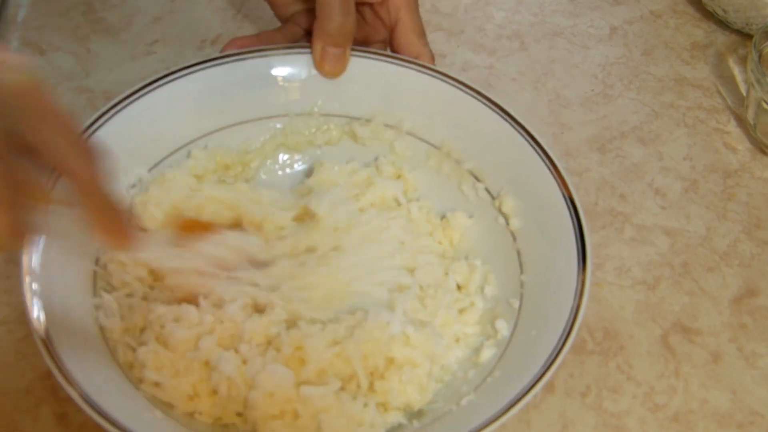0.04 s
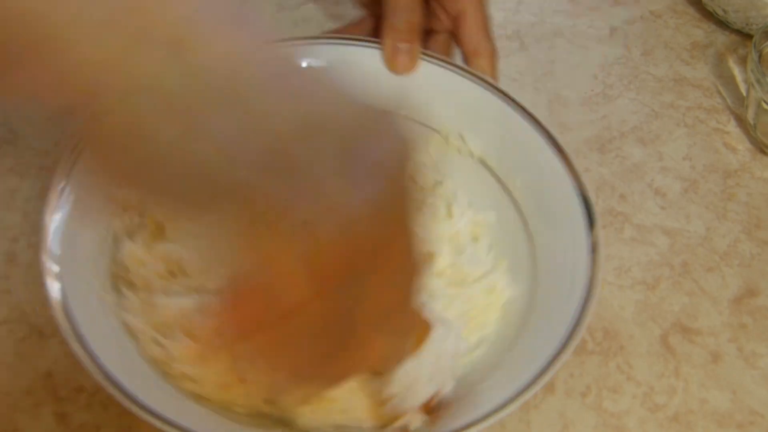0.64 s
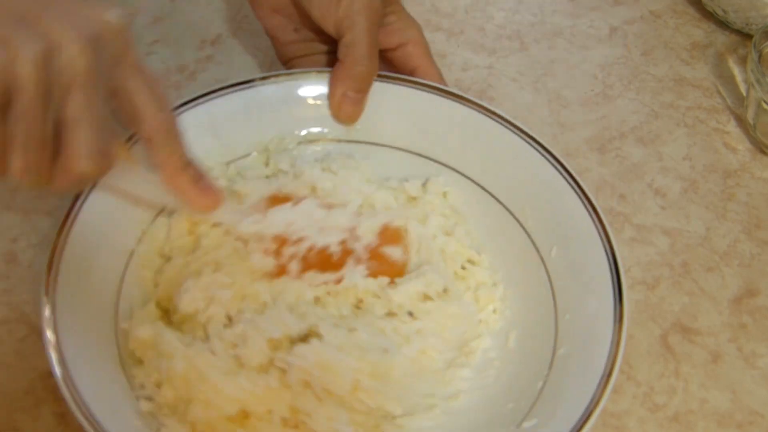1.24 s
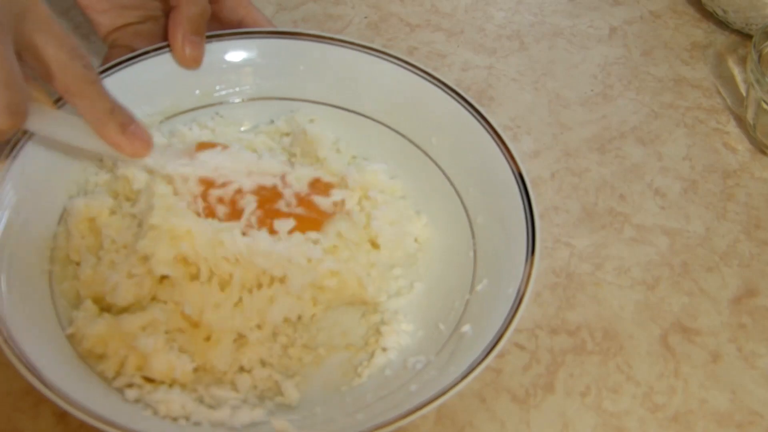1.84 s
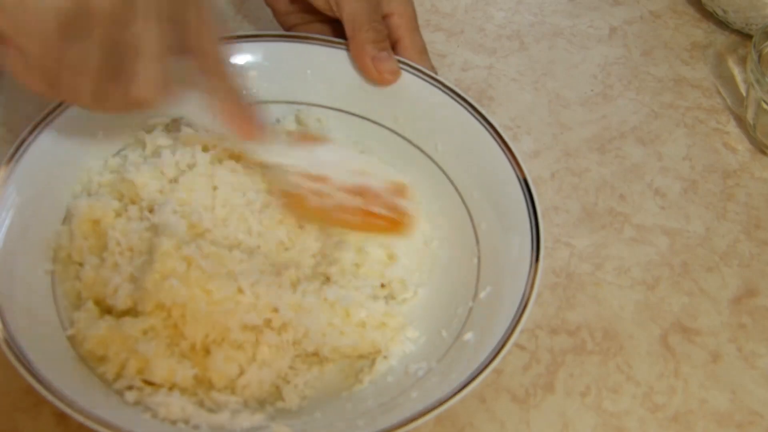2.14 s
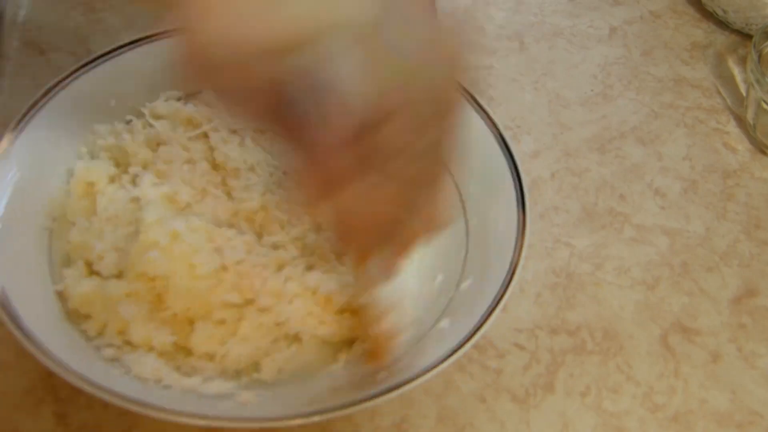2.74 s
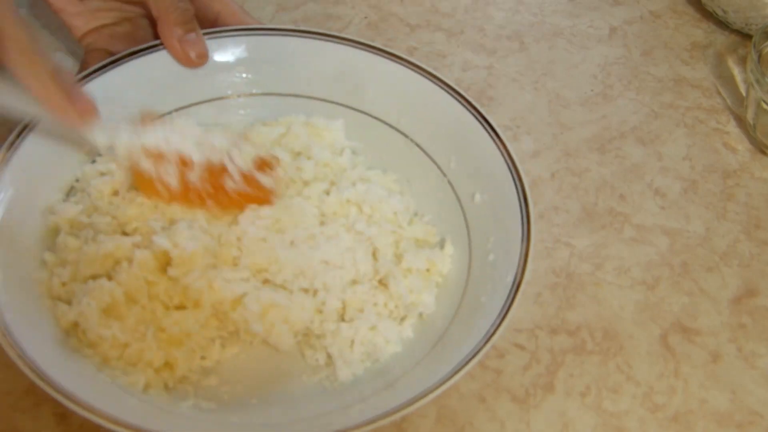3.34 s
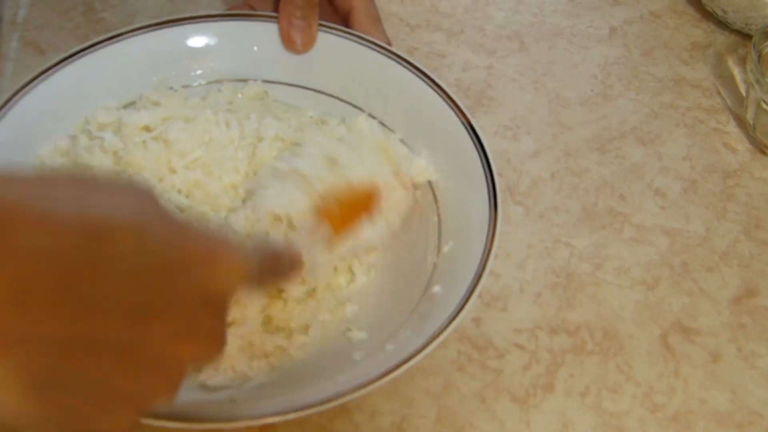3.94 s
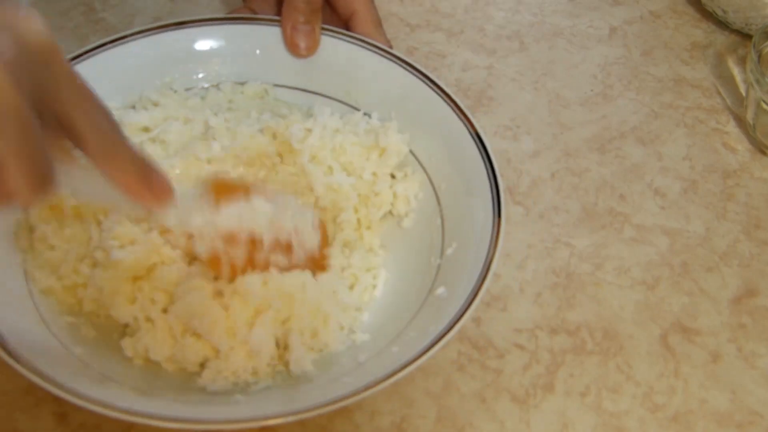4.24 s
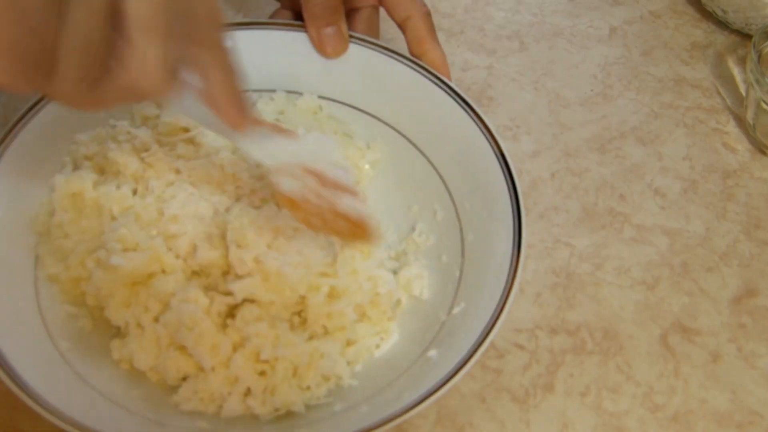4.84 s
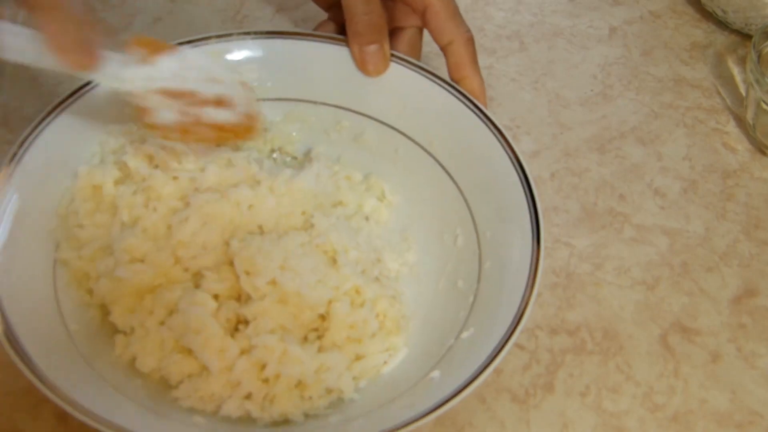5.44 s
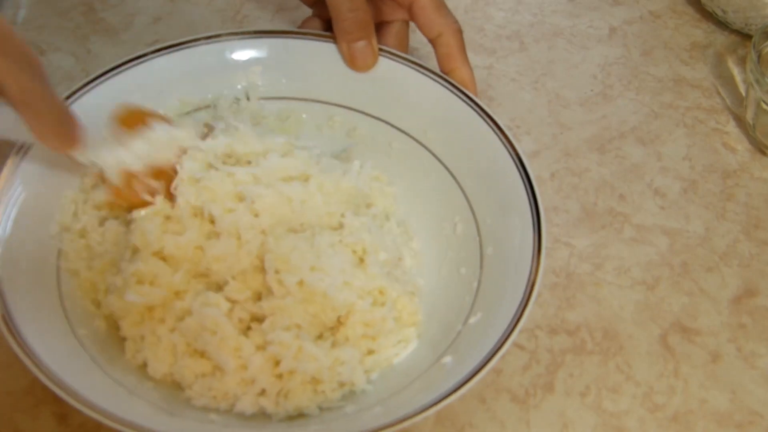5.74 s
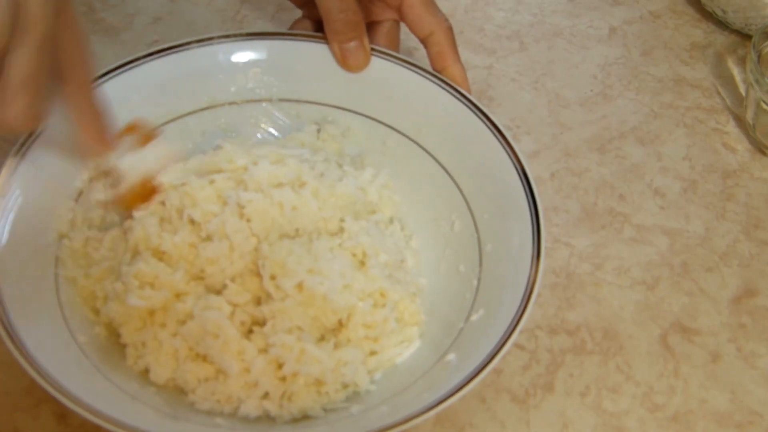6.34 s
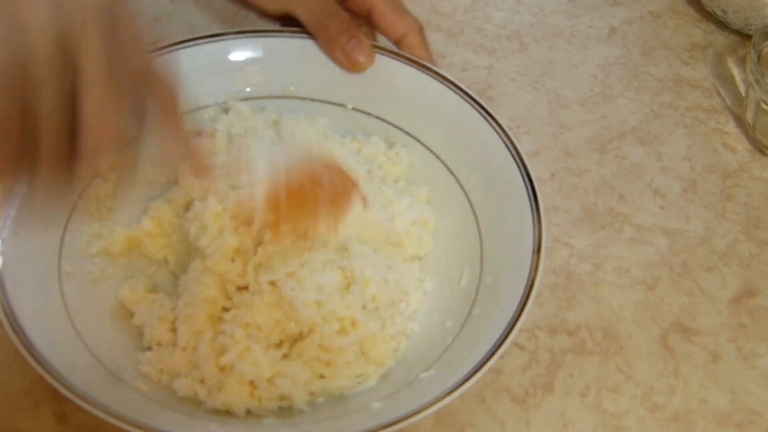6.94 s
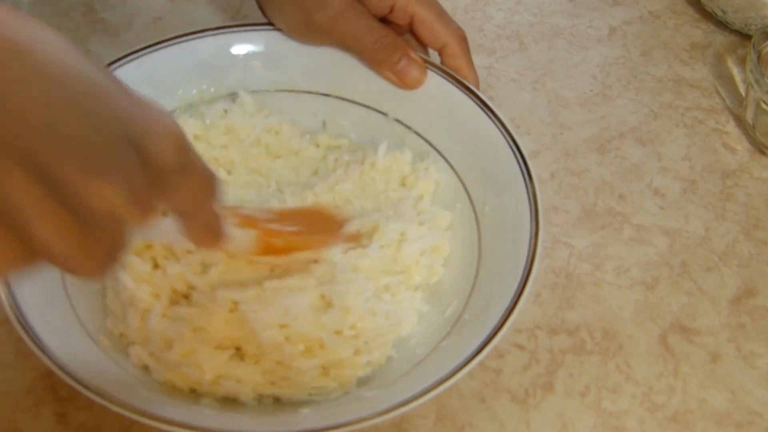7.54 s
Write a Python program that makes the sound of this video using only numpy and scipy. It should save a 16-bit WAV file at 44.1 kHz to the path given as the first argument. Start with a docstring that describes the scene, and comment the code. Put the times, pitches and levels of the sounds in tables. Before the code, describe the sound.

A rubber spatula folds sticky, crumbly dough in a ceramic bowl, heard close up in a quiet kitchen with short reflections and a faint room hush. Soft, gritty scrapes swell and fade in uneven strokes, strongest around 0.7, 1.5, 2.9 and 3.9 seconds. Throughout, the dough gives fine moist crackles, brief squelches and tiny sharp pops, the sharpest near 5.8 seconds. The blade knocks irregularly on the bowl, dull and quickly damped, most clearly at about 1.9 and 2.6 seconds and twice around 4. From 5 seconds the scraping eases, and faint rubbery squeaks follow until 5.4. A run of knocks comes between 5.5 and 6 seconds. A tiny chirp and a very faint high ting sound near 6.4. Scraping returns at 6.5, with another clear knock at 6.8 and two slight squeaks just after 7, and the folding continues lightly until about 7.6 seconds.

```python
"""On a kitchen counter, a rubber spatula folds flour into sticky, crumbly dough in a hand-held ceramic
bowl. Friction on floury grit makes the blade scrape along the wall; the dough crackles and squelches
as its threads and air pockets break. Impacts excite the bowl's damped modes in dull knocks, and
stick-slip on the glaze gives faint squeaks. One small, high ting rings out. Close reflections and a
short reverberant tail follow the sounds, over the hush of the room."""
import sys
import numpy as np
from scipy import signal
from scipy.fft import rfft, irfft, next_fast_len
from scipy.io import wavfile

SR = 44100
rng = np.random.default_rng(int(sys.argv[2]) if len(sys.argv) > 2 else 0)


def unload_wav(signal):
    """Save mono or channel-first audio to the path in sys.argv[1] as 16-bit WAV at rate SR, clipped to [-1, 1]."""
    wavfile.write(
        sys.argv[1],
        SR,
        np.round(np.clip(np.atleast_2d(signal).T, -1, 1) * 32767).astype(np.int16),
    )


N = 335141
TIME = np.arange(N) / SR

# Normal modes of the bowl, damped by dough and hand: (frequency [Hz], level [dB], t60 [s])
BOWL_MODES = [(193,-15.5,0.042),(243.4,-16.5,0.079),(314.6,-11.5,0.062),(436.5,-8,0.048),(495,-22.5,0.2),(528,-19.5,0.13),(643,-25,0.11),(825,-44,0.074),(861,-19,0.19),
              (1092,-22.5,0.15),(1504,-21,0.022),(1600,-17.5,0.038),(1737,-10,0.076),(1800,-4.5,0.018),(2429,-5.5,0.027),(2497,-7,0.083),(2810,7.5,0.004),(3900,-16.5,0.1)]


def from_db(db):
    """Amplitude ratio of a level in decibels."""
    return 10 ** (np.asarray(db) / 20)


def unit_rms(x):
    """Normalisation to an rms of 1."""
    return x / np.sqrt(np.mean(x ** 2) + 1e-20)


def at_hz(points, hz):
    """Interpolation of (frequency [Hz], value) points on a logarithmic frequency axis."""
    frequencies, values = np.transpose(points)
    return np.interp(np.log(np.maximum(hz, 1)), np.log(frequencies), values)


def butter(x, hz, kind, order=2):
    """Butterworth filter: a maximally flat passband."""
    sections = signal.butter(order, np.clip(hz, 10, .45 * SR), kind, fs=SR, output="sos")
    return signal.sosfilt(sections, x + 1e-18)


def coloured(x, spectrum):
    """Spectral shaping by (frequency [Hz], level [dB]) points; rms 1."""
    size = next_fast_len(N)
    gain = from_db(at_hz(spectrum, np.fft.rfftfreq(size, 1 / SR)))
    return unit_rms(irfft(rfft(x, size) * gain, size)[..., :N])


def drift(per_s):
    """Random modulation: straight lines between standard normal values, per_s of them a second."""
    knots = rng.standard_normal(10000)
    return np.interp(TIME * per_s, np.arange(len(knots)), knots)


def grains(per_s, spread_db):
    """Shot noise: a Poisson train of clicks, their sizes spread up (+) or down (-); rms 1."""
    sizes = from_db(spread_db * np.minimum(rng.exponential(1, N), 4))
    return unit_rms(sizes * rng.choice([-1, 1], N) * (rng.random(N) < per_s / SR))


def ring(x, hz, t60):
    """Damped oscillator: a unit impulse starts a unit sine that falls 60 dB in t60 seconds."""
    radius, angle = from_db(-60 / (t60 * SR)), 2 * np.pi * hz / SR
    return signal.lfilter([0, np.sin(angle)], [1, -2 * radius * np.cos(angle), radius ** 2], x + 1e-18)


def placed(x, right_db):
    """Stereo position by a level difference between the channels."""
    return x * from_db(np.array([[-.5], [.5]]) * right_db)


def widened(mid, side, side_db, above_hz):
    """Mid-side stereo: the side signal is high-passed, so the bass is alike in both ears."""
    return mid + from_db(side_db) * butter(side, above_hz, "high", order=1) * [[1], [-1]]


def hush(level_db=-66):
    """Ambient noise of the room: steady, and strongest in the bass."""
    # Noise spectrum: (frequency [Hz], level [dB])
    spectrum = [(25,8),(70,-8),(140,-10),(230,1),(550,-3),(1100,1),(2000,-6.5),(4500,-13),(16000,-18.5)]
    mid, side = coloured(rng.standard_normal((2, N)), spectrum)
    return from_db(level_db) * widened(mid, side, side_db=4, above_hz=320)


def reflections(early_db, early_s, side_db):
    """Room impulse response: close echoes from counter and wall, then a tail whose treble dies first."""
    # Reverberation time of the kitchen: (frequency [Hz], t60 [s])
    decay_times = [(200,0.22),(600,0.32),(1500,0.27),(4000,0.24),(9000,0.16),(15000,0.11)]
    age = np.arange(SR // 2) / SR
    edges_hz = np.geomspace(100, 17000, 11)
    white, tail = rng.standard_normal((2, len(age))), 0
    for low, high in zip(edges_hz, edges_hz[1:]):
        t60 = at_hz(decay_times, np.sqrt(low * high))
        tail += butter(white, [low, high], "band") * from_db(-60 * age / t60)
    onset = np.clip((age - .002) / .0039, 0, 1)
    tail *= onset * (1 + from_db(early_db) * np.exp(-age / early_s))
    mid, side = tail / np.sqrt(np.sum(tail ** 2, axis=1, keepdims=True))
    return widened(mid, side, side_db, above_hz=430)


def kitchen(x, wet_db, early_db, early_s, side_db, turns_per_s):
    """Reverberation of a moving source: the reflections change as the contact circles the bowl."""
    angle, out = 2 * np.pi * turns_per_s * TIME, x
    for share in (np.cos(angle), np.sin(angle)):
        echo = signal.fftconvolve(x * share, reflections(early_db, early_s, side_db), axes=1)
        out = out + from_db(wet_db) * echo[:, :N]
    return out


def ting(touch_s=6.43):
    """Free vibration: something small and hard is touched once and rings on."""
    # Modes of the object: (frequency [Hz], level [dB], t60 [s])
    modes = [(5600,-60.5,0.54),(10300,-52,0.23),(12860,-54,0.1)]
    touch = signal.unit_impulse(N, int(touch_s * SR))
    return sum(from_db(db) * ring(touch, hz, t60) for hz, db, t60 in modes)


def stroke_db(start, end, attack_db_per_s=461, release_db_per_s=414):
    """Envelope of a stroke: exponential rise, 0 dB from start to end, exponential decay."""
    return np.minimum(0, np.minimum(attack_db_per_s * (TIME - start), release_db_per_s * (end - TIME)))


def stroke_levels(swell_db=12.5, ease_db=15.5, rest_scrape_db=-75.5, rest_crackle_db=-70.5):
    """Envelopes of scrape and crackle in dB: the strongest stroke sets each; at rest, dough settles."""
    # Sweeps along the wall: (start [s], hardest push [s], end [s], level [dB])
    sweeps = [(0.068,0.123,0.32,-51.5),(0.24,0.313,0.37,-48),(0.35,0.492,0.59,-49.5),(0.55,0.715,0.86,-40),(0.793,0.914,1.064,-46),(1.306,1.547,1.83,-43),(1.618,1.716,1.8,-44),
              (2.44,2.564,3.03,-50.5),(2.57,2.89,3.13,-46),(3.668,3.783,3.84,-47.5),(3.783,3.936,3.97,-43),(4.72,4.76,4.16,-51.5),(4.97,5.395,6.7,-62.5),
              (6.51,6.61,7.1,-53.5),(6.68,6.8,6.96,-45),(7,7.082,7.45,-52.5)]
    # Folds pressed into the dough: (start [s], end [s], level [dB])
    folds = [(0.07,0.188,-51.5),(0.628,0.753,-52.5),(0.824,0.97,-51.5),(1.255,1.404,-57.5),(1.513,1.58,-52.5),(1.898,2.019,-52),(2.213,2.273,-57),(2.444,2.496,-50.5),
             (2.888,3.066,-53.5),(3.201,3.301,-52),(3.423,3.553,-51.5),(3.652,3.708,-55),(3.92,4.076,-53),(4.113,4.31,-54.5),(4.416,4.438,-54),(4.706,4.85,-52.5),(5.012,5.052,-59),
             (5.203,5.493,-63),(5.353,5.412,-54.5),(5.653,5.818,-52.5),(5.932,5.959,-44.5),(6.133,6.275,-59.5),(6.35,6.40,-54.5),(6.552,6.844,-55.5),(7.006,7.103,-53),
             (7.31,7.446,-58.5),(7.567,7.605,-51.5)]
    sweep_db = np.max([db + stroke_db(start, end)
                       - np.interp(TIME, [start, hardest, end], [swell_db, 0, ease_db])
                       for start, hardest, end, db in sweeps], axis=0)
    fold_db = np.max([db + stroke_db(start, end) for start, end, db in folds], axis=0)
    scrape_db = np.maximum(sweep_db, fold_db - 8)   # a fold also rubs the wall
    crackle_db = np.maximum(fold_db, sweep_db - 14)   # a sweep also drags some dough
    return np.maximum(scrape_db, rest_scrape_db), np.maximum(crackle_db, rest_crackle_db)


def rub(band_hz=(560, 1200), judder_db=3):
    """Sliding friction of flat rubber on bare glaze: dull, uneven noise with no grit in it."""
    # Strokes with the flat of the blade: (start [s], end [s], level [dB])
    strokes = [(5.077,5.51,-66.5),(6.556,7.6,-66.5)]
    level_db = np.max([db + stroke_db(start, end) for start, end, db in strokes], axis=0)
    slips = unit_rms(butter(rng.standard_normal(N), band_hz, "band"))
    return from_db(level_db + judder_db * drift(65)) * slips


def squeak(judder_waver=.03, squeak_waver=.04, flutter_db=4.5):
    """Stick-slip oscillation of the rubber edge on glaze: a low judder and a thin, broken squeak."""
    # Course of the slip: (time [s], judder [Hz], judder level [dB], squeak [Hz], squeak level [dB])
    course = [(5.09,208,-80,1010,-71),(5.12,202,-55,985,-64),(5.152,188,-59,935,-52),(5.178,163,-66,915,-79),(5.225,138,-84,925,-55),
              (5.285,288,-85,930,-62),(5.315,326,-66,1255,-58),(5.36,295,-58,1265,-66),(5.45,288,-80,1280,-77)]
    times, *columns = np.transpose(course)
    judder_hz, judder_db, squeak_hz, squeak_db = [np.interp(TIME, times, column) for column in columns]
    out = np.zeros(N)
    for hz, db, waver in ((judder_hz, judder_db, judder_waver), (squeak_hz, squeak_db, squeak_waver)):
        phase = 2 * np.pi * np.cumsum(hz * (1 + waver * drift(400))) / SR
        out += from_db(db + flutter_db * drift(70)) * np.sin(phase)
    return out * ((TIME > times[0]) & (TIME < times[-1]))


def chirps(sag=.037, waver=.066):
    """Brief stick-slip of the wet blade: hoarse tones that swell and fade as their pitch sags."""
    # Slips of wet rubber: (time [s], duration [s], frequency [Hz], level [dB])
    slips = [(6.349,0.064,3900,-54),(7.065,0.058,1107,-57),(7.197,0.044,1033,-56)]
    out, unsteady = np.zeros(N), 1 + waver * drift(710)
    for start, duration, hz, db in slips:
        progress = np.linspace(0, 1, int(duration * SR))
        span = slice(int(start * SR), int(start * SR) + len(progress))
        phase = 2 * np.pi * np.cumsum(hz * (1 + sag * (.5 - progress)) * unsteady[span]) / SR
        out[span] += from_db(db) * np.sin(np.pi * progress) ** 2 * np.sin(phase)
    return out


def bowl(force, vary_db):
    """Modal superposition: each mode couples more or less strongly as the point of contact wanders."""
    return sum((-1) ** k * ring(force * from_db(db + vary_db * drift(3.6)), hz, t60)
               for k, (hz, db, t60) in enumerate(BOWL_MODES))


def lumps(scrape_db, gain_db=-25, db_per_db=.77, glide_db=-55):
    """Forced vibration: soft lumps drive the bowl's low modes, up to a limit where the blade glides."""
    bumps = grains(per_s=530, spread_db=-12.5)
    force = butter(butter(bumps, 213, "low", order=3), 235, "high", order=3)
    level_db = db_per_db * np.minimum(scrape_db, glide_db) + gain_db
    return from_db(level_db) * unit_rms(bowl(force, vary_db=-6.5))


def scrape(level_db, gain_db=-2, bowl_db=-4, blade_db=-5, judder_db=1.7, crumb_db=2.14, wander_db=8):
    """Friction noise: slips on floury grit drive the bowl and the resonances of the bending blade."""
    # Spectrum of the slips: (frequency [Hz], level [dB])
    spectrum = [(70,-54),(140,-49),(290,-9.5),(420,-25),(720,-10.5),(1100,-0.5),(1800,0),(2700,-2),(4000,4),(5500,-2.5),(8000,-4.5),(15000,-10.5)]
    slips = coloured(grains(per_s=5500, spread_db=.5), spectrum)
    slips *= from_db(judder_db * drift(110) + crumb_db * drift(40))   # the blade catches on crumbs
    through_bowl = from_db(bowl_db) * unit_rms(bowl(slips, vary_db=2))
    blade_modes = sum(ring(slips * from_db(wander_db * np.tanh(drift(14))), hz, t60=.01)
                      for hz in np.geomspace(1500, 4300, 20))
    through_blade = from_db(blade_db) * unit_rms(blade_modes)
    return from_db(level_db + gain_db) * unit_rms(slips + through_bowl + through_blade)


def ruptures(per_s, spread_db, cycles, patchy_db=4):
    """Acoustic emission: threads and bubbles of shifting sizes break and ring a few cycles; rms 1."""
    # Spectral weighting of the breaks: (frequency [Hz], level [dB])
    spectrum = [(100,-13),(250,-24.5),(1500,-11.5),(3500,-5),(5800,-5.5),(7200,-1.5),(10000,0),(13000,-0.5),(16000,-11.5)]
    breaks = grains(per_s, spread_db)
    pitches_hz = np.geomspace(1800, 15000, 16)
    pitch_index = rng.integers(0, len(pitches_hz), N)
    pops = sum(hz * ring(breaks * (pitch_index == k) * from_db(patchy_db * drift(30)), hz, cycles / hz)
               for k, hz in enumerate(pitches_hz))
    return coloured(pops, spectrum)


def crackle(level_db, gain_db=-2, clump_db=4):
    """Amplitude-modulated shot noise: dough under the fold breaks in clumps of tiny ruptures."""
    envelope = from_db(level_db + gain_db + clump_db * drift(130))
    return envelope * ruptures(per_s=4700, spread_db=0, cycles=2.9)


def pockets():
    """Cavity resonance: each larger air pocket rings at its own pitch as it opens."""
    # Opening pockets: (time [s], frequency [Hz], level [dB], t60 [s])
    openings = [(3.505,7090,-34.5,0.032),(3.524,6920,-37,0.027),(5.771,3910,-27,0.019),(5.772,3370,-32,0.019)]
    return sum(from_db(db) * ring(signal.unit_impulse(N, int(start * SR)), hz, t60)
               for start, hz, db, t60 in openings)


def squelches(crossover_hz=6000, low_gain_db=8.5, bump_db=-30, bump_hz=100):
    """Adhesive failure: dough peels off in a quick run of breaks, and the freed bowl bumps softly."""
    # Peeling patches: (time [s], level [dB], duration [s], weight of the bigger, lower pockets [dB])
    peels = [(0.88,-36,0.031,-11),(1.044,-38.5,0.027,-11.5),(1.258,-51.5,0.052,-7),(1.363,-35.5,0.014,-14),(1.722,-43,0.073,-9),(2.241,-38.5,0.0068,-24),(2.297,-44,0.025,-11.5),(3.268,-45.5,0.019,-2),
             (3.5,-38.5,0.022,-6.5),(3.524,-36,0.016,-3),(3.65,-38.5,0.018,-8.5),(4.244,-61,0.042,9.5),(4.289,-36,0.0096,-11.5),(4.396,-49.5,0.018,-9),(4.457,-42,0.029,-13),
             (4.719,-36,0.013,-2),(4.83,-50,0.04,-14),(5.676,-53,0.091,1.5),(5.79,-41,0.024,-9),(6.201,-49,0.017,-6.5),(6.365,-44,0.021,-10.5),
             (6.613,-54.5,0.012,8),(6.67,-37.5,0.017,-4.5),(7.021,-42.5,0.025,-6),(7.551,-41,0.012,-8.5)]
    envelope, low_envelope = np.zeros((2, N))
    for start, db, duration, low_db in peels:
        progress = np.maximum(TIME - start, 0) / duration
        burst = from_db(db) * np.minimum(progress * 8, 1) * np.exp(-np.minimum(progress, 6) ** 2)
        envelope += burst
        low_envelope += burst * from_db(low_db + low_gain_db)
    breaks = ruptures(per_s=14000, spread_db=5.5, cycles=3.9)
    high, low = butter(breaks, crossover_hz, "high"), butter(breaks, crossover_hz, "low")
    bump = from_db(bump_db) * unit_rms(butter(rng.standard_normal(N), bump_hz, "low"))
    return envelope * (high + bump) + low_envelope * low


def snaps(fizz_db=-11, fizz_s=.004, pocket_db=-16):
    """Impulsive rupture of a crumb or air pocket: a click, a short fizz and the ring of the cavity."""
    # Single ruptures: (time [s], level [dB], lower band edge [Hz])
    breaks = [(0.05,-37,6950),(0.9043,-25.5,5050),(1.044,-33,6900),(1.1947,-49,3300),(1.367,-24.5,6800),(1.789,-38,6100),(2.4160,-29.5,2770),(2.443,-40,6150),
              (3.528,-18.5,6370),(4.0362,-18.5,5570),(4.463,-26.5,5160),(4.8474,-38,5500),(5.401,-36,3470),(5.674,-20,10400),(5.7722,-10,2180),(5.975,-34,7000),(6.0073,-19.5,4830),
              (6.4184,-25.5,3360),(6.428,-26,8500),(6.532,-32.5,8240),(6.618,-21,2370),(6.6728,-19.5,8400),(6.872,-30.5,8700),(6.9635,-41.5,7100),(7.046,-33,7500),(7.306,-33.5,7840),(7.434,-32,5700)]
    out, age = np.zeros(N), np.arange(SR // 30) / SR
    for start, db, edge_hz in breaks:
        burst = from_db(fizz_db) * rng.standard_normal(len(age)) * np.exp(-age / fizz_s)
        burst[0] += 2   # the click
        burst = butter(burst, edge_hz, "high")
        cavity = from_db(pocket_db) * ring(burst, 1.43 * edge_hz, t60=3.4 / edge_hz)
        snap = butter(burst, 2 * edge_hz, "low", order=1) + cavity
        at = int(start * SR)
        out[at:at + len(age)] += from_db(db) * snap[:N - at]
    return out


def contact_force(tap, rebound=.62, rebound_s=.003067, crumb_db=-22, crumb_s=.0015,
                  chatter_db=-27, chatter_s=.006, rattle_db=-8, rattle_s=.014):
    """Impact force: a tap roughened by crumbs, a rebound, blade chatter and a rattle on the counter."""
    age = np.arange(len(tap)) / SR
    grit, rattle = rng.standard_normal((2, len(tap)))
    contact = tap + from_db(crumb_db) * grit * np.exp(-age / crumb_s)
    contact[int(rebound_s * rng.uniform(.95, 1.05) * SR)] -= rebound
    contact += from_db(chatter_db) * np.roll(grit, len(tap) // 2) * (age < chatter_s)
    rattle *= np.exp(-age / rattle_s) * (age > rebound_s)
    return contact / np.linalg.norm(contact) + from_db(rattle_db) * rattle / np.linalg.norm(rattle)


def loaded_bowl(force, pitch_spread=.011, spread_db=1.5):
    """Modal loading: hand and dough shift each mode's pitch and level anew at every blow."""
    loading = rng.normal(0, [pitch_spread, spread_db], (len(BOWL_MODES), 2))
    return sum((-1) ** k * from_db(db + shift_db) * ring(force, hz * (1 + detune), t60)
               for k, ((hz, db, t60), (detune, shift_db)) in enumerate(zip(BOWL_MODES, loading)))


def knock(force_db, hardness_db, clack_hz, cushion_below_db=-28.5, cushion_db_per_db=.38):
    """Impact response: a heavily damped clack, the ring of the bowl and a thud from the counter."""
    tap = signal.unit_impulse(SR // 5)
    contact = from_db(force_db + hardness_db) * contact_force(tap)
    shove = from_db(force_db + 9) * butter(butter(tap, 390, "low"), 210, "high", order=7)
    body = from_db(8.5) * butter(contact, [620, 2300], "band")
    cushion_db = cushion_db_per_db * max(cushion_below_db - force_db, 0)   # dough dulls light blows
    edge = from_db(2 - cushion_db) * butter(butter(contact, 4180, "high"), 2775, "low", order=4)
    clack = ring(body, clack_hz, t60=.0019) + 14.2 * edge + ring(shove, hz=497, t60=.0028)
    ringing = loaded_bowl(from_db(-1.5) * shove + from_db(-12) * (edge - body))
    thud = from_db(force_db + 19) * butter(tap, 100, "low")
    return from_db(10) * clack + ringing + thud


def knocks(delay_s=.0026):
    """Linear superposition of the blade's blows: mostly impacts on the bowl, plus a few soft plops into the
    dough."""
    # Blows: (time [s], force [dB], contact hardness [dB], clack frequency [Hz])
    blows = [(0.0806,-35.5,1.5,1320),(0.14,-46.5,-2,1190),(0.2155,-45,8,1360),(0.2272,-50.5,2,1290),(0.261,-47.5,1,1200),(0.396,-54,1,1200),(0.579,-51,12.5,1230),(0.817,-53,-13,1200),
             (1.531,-43.5,0.5,1200),(1.798,-50,-3,1300),(1.908,-30.5,4,1260),(2.4115,-44,-13,1100),(2.571,-30,4.5,1390),
             (2.959,-49.5,8,1150),(3.044,-41.5,-6,1250),(3.174,-42.5,2,1340),(3.302,-49,1.5,1080),(3.9271,-30,4,1100),(4.0324,-26.5,10.5,1380),(4.407,-51,-3.5,1280),(4.546,-50.5,3.5,1520),
             (4.732,-36.5,-4.5,1270),(4.77,-44,-9,1200),(4.959,-49.5,-1,880),(5.05,-46,-5.5,890),(5.494,-44,5.5,1150),(5.5122,-37.5,5.5,1190),(5.6607,-32.5,-5,1460),(5.7216,-36.5,13,1350),
             (5.821,-39.5,5,1200),(5.9238,-27,2,1080),(6.041,-32.5,4,1250),(6.539,-50,-5,1220),(6.784,-44,-1,1200),(6.7981,-28.5,7,1370),(7.073,-58,1,1120)]
    out = np.zeros(N + SR)
    for start, force_db, hardness_db, clack_hz in blows:
        blow = knock(force_db, hardness_db, clack_hz)
        at = int((start + delay_s) * SR)
        out[at:at + len(blow)] += blow
    return out[:N]


def scene():
    """Sources sum in the room: the bowl a little to the right, the dough central, over the hush."""
    scrape_db, crackle_db = stroke_levels()
    ceramic = placed(knocks() + lumps(scrape_db) + rub() + squeak() + chirps(), right_db=2.5)
    ceramic += placed(scrape(scrape_db), right_db=1.5)
    dough = placed(crackle(crackle_db) + pockets() + squelches() + snaps() + ting(), right_db=-.1)
    background = hush()
    ceramic = kitchen(ceramic, wet_db=-7.5, early_db=6, early_s=.012, side_db=-1, turns_per_s=.9)
    dough = kitchen(dough, wet_db=-9, early_db=9, early_s=.008, side_db=0, turns_per_s=1.7)
    return background + ceramic + dough


def record(dry, cutoff_hz=16200, dc_offset=-.0028):
    """Band limiting by a steep elliptic low-pass, plus the converter's small constant offset."""
    low_pass = signal.ellip(10, .2, 80, cutoff_hz, fs=SR, output="sos")
    return signal.sosfilt(low_pass, dry) + dc_offset


dry = scene()
out = record(dry)
unload_wav(out)
```